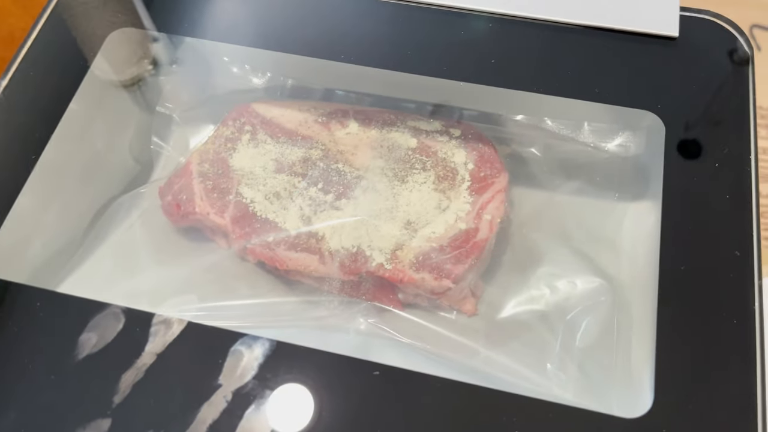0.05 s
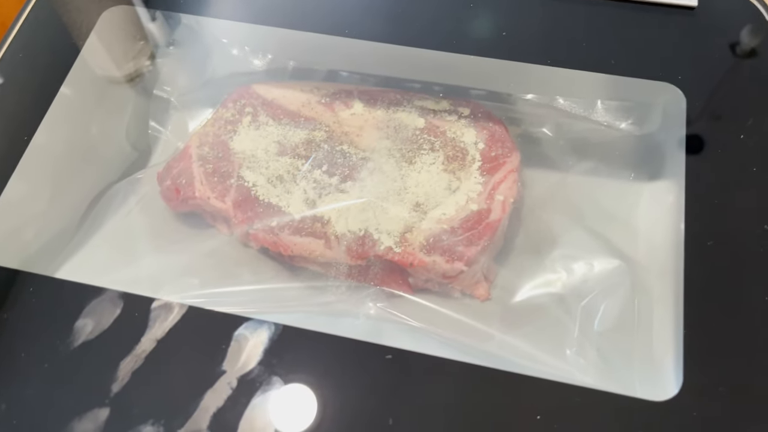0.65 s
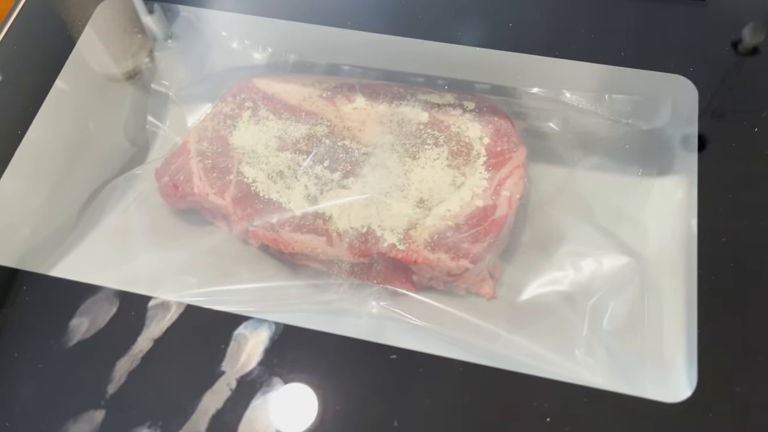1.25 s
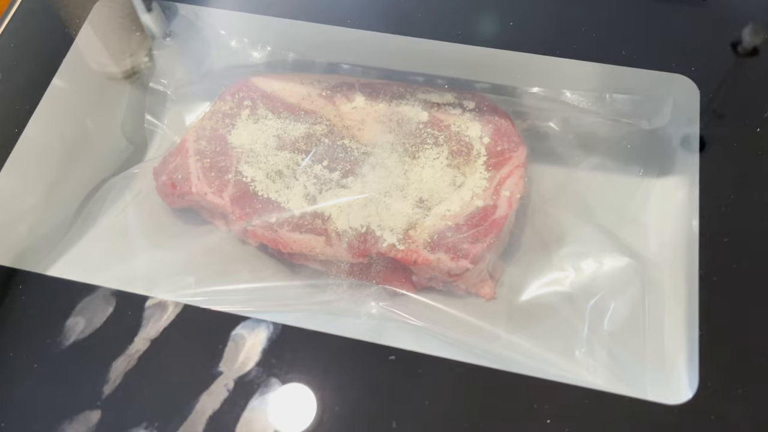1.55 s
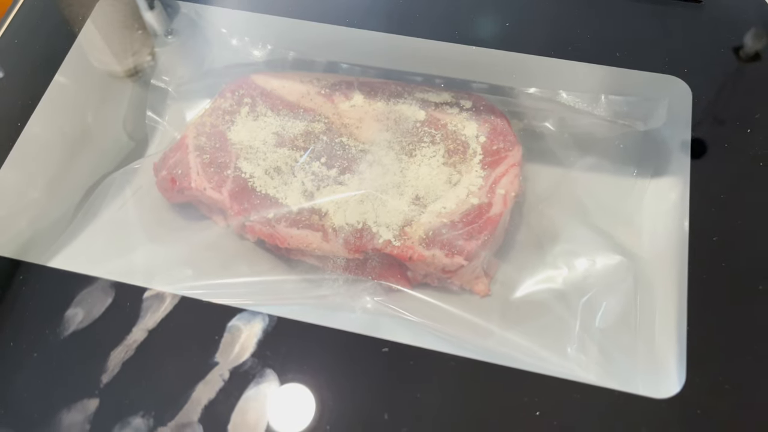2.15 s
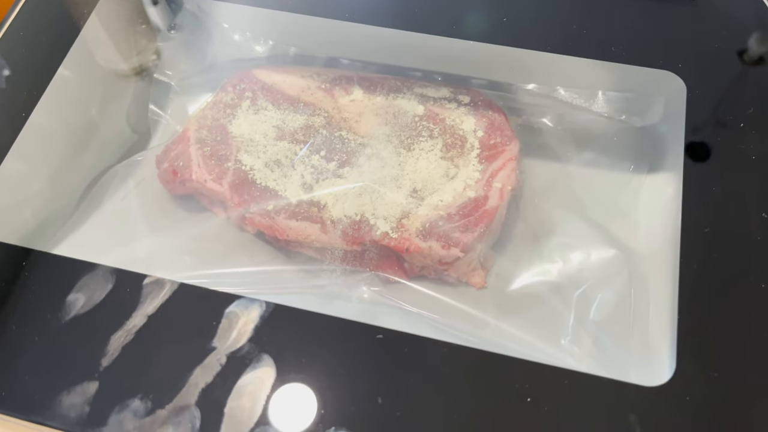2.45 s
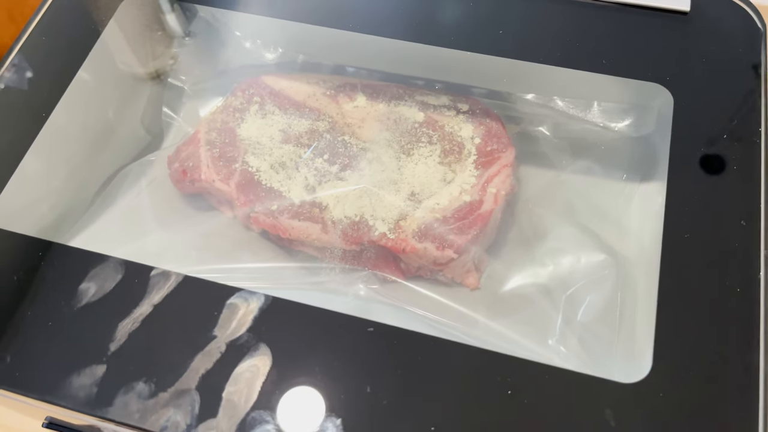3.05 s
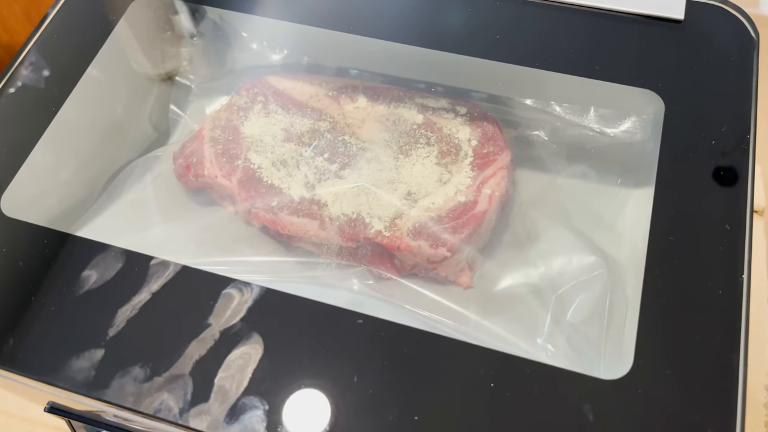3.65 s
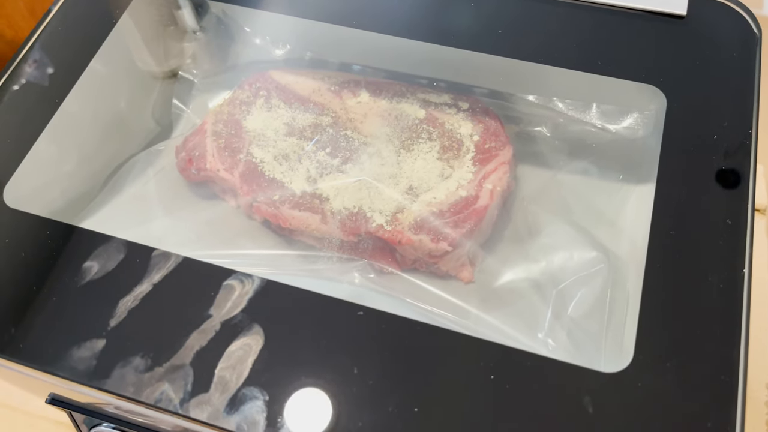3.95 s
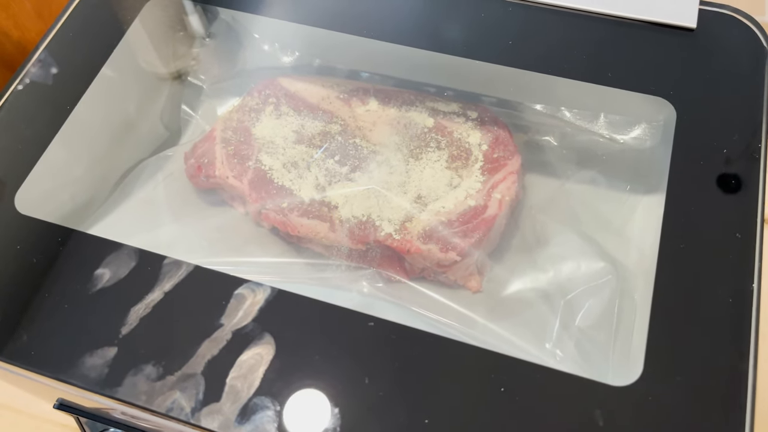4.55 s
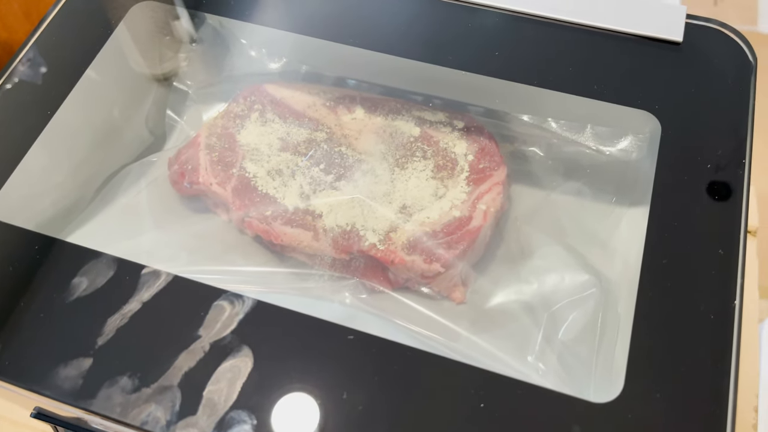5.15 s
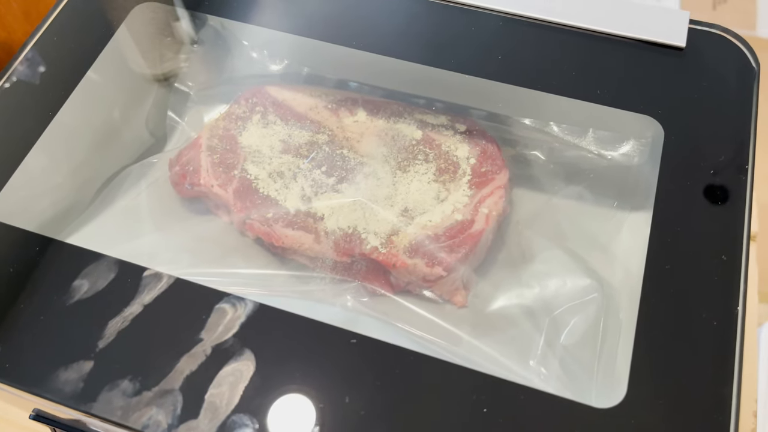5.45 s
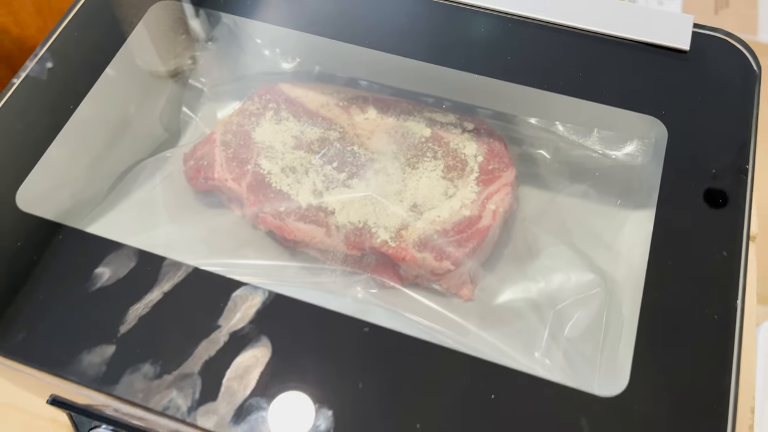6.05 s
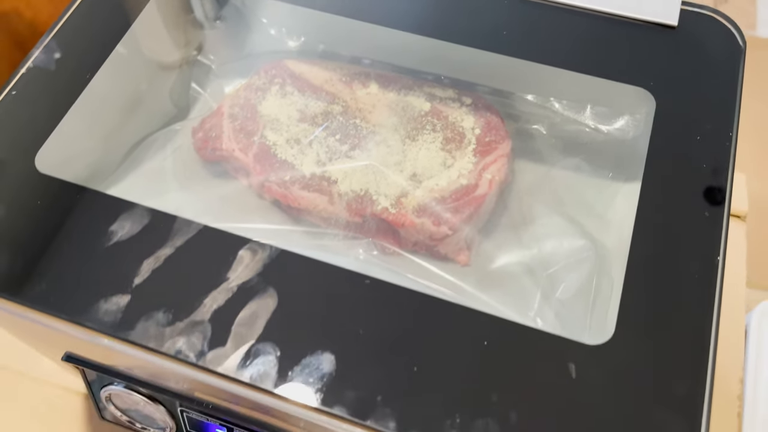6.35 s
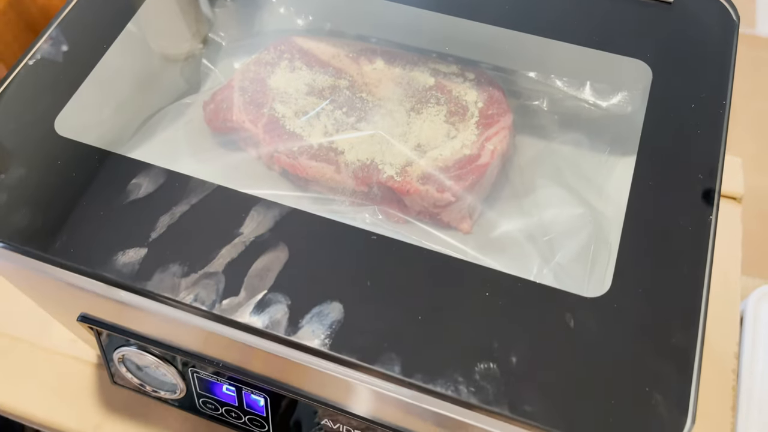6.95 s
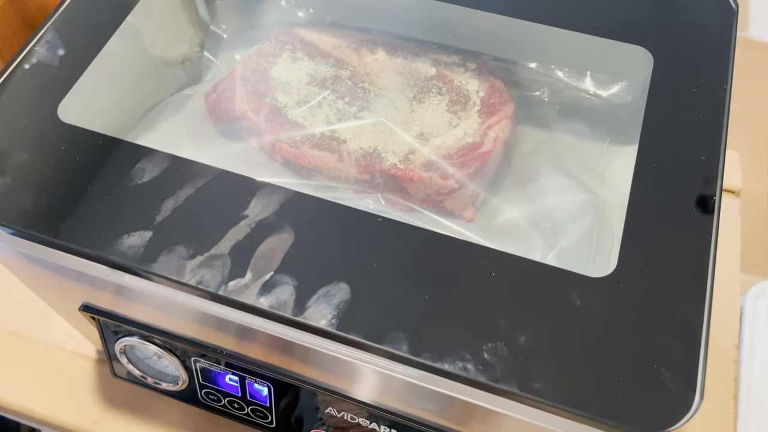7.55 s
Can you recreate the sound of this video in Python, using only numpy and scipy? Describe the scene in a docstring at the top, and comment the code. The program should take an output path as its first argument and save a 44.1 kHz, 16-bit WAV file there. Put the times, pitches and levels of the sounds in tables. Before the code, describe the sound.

A vacuum sealer runs on a kitchen counter from start to finish, about eight seconds, heard from close by. Its pump makes a loud, steady hum of very rapid, even thumps with a slight throb. Above it sit a buzzing rasp and a thin hiss of air pulsing with the pump, and underneath is a low fan drone. Over the first few seconds the pump speeds up very slightly and sounds a little thinner. The plastic bag rustles faintly at about 0.6 seconds, then crinkles and snaps briefly between 1.7 and 2.6 seconds, most clearly near 2.2. A hand makes soft, low bumps on the microphone between 3.4 and 4.2 seconds, and again around 6.6 and 6.9. From about 6 seconds the microphone draws back, and the hum softens a little while the airy rasp carries on.

```python
"""A vacuum sealer on a kitchen counter

A piston pump runs at about 36 turns a second. Each turn brings a piston thump, an exhaust slap
and an inlet tick, with spits of air at the valves. A fan hums, and the pump throbs against it.
As the chamber empties, the pump speeds up and sounds thinner, and the bag crinkles.
A hand softly bumps the microphone, which draws back near the end."""
import sys
import numpy as np
from scipy import signal
from scipy.fft import rfft, irfft, next_fast_len
from scipy.io import wavfile
from scipy.ndimage import map_coordinates

SR = 44100
rng = np.random.default_rng(int(sys.argv[2]) if len(sys.argv) > 2 else 0)


def int16_out(signal):
    """Quantize to a 16-bit WAV file."""
    q = np.round(np.clip(np.atleast_2d(signal).T, -1, 1) * 32767)
    wavfile.write(sys.argv[1], SR, q.astype(np.int16))


N = 343980
TIME = np.arange(N) / SR

# The microphone draws back. Each row: time in seconds, how far back from 0 to 1.
MIC_RETREAT = [(0, 0.07), (5.8, 0.29), (7, 0.86), (7.8, 1)]
# The tones that each kind of blow sets ringing. Each row: pitch in Hz, width in Hz (wider dies
# sooner), level in dB, dB added at full vacuum, dB added with the microphone drawn back,
# dB by which the left is louder than the right, radians by which the left is ahead.
PISTON_TONES = [(75.53, 9.9, -28.5, -1.3, -1.181, -0.2, 0.065), (160.5, 32, -41, 4.5, -3, -1, 0.7),
                (201.3, 26.3, -21, -0.5, -1.7, -0.3, -0.171), (263.8, 125.6, -22.5, -5, -2, 0.4, -0.23),
                (365.4, 86.4, -24, -2.5, -2.4, -5, -0.68), (384.45, 22.5, -25.5, 1, -1.2, -4, -1.34),
                (513.1, 20, -33.5, -0.7, -3, 6, -0.55), (1230.4, 280, -49, 1, -26, -9.5, 1),
                (1588, 129, -46, -1.5, 0.2, -6.5, 0.56), (1732, 390, -49, -1.5, -10, 7.5, 0.73)]
EXHAUST_TONES = [(301.2, 94, -27.5, -3, -16, -0.5, 0.55), (477.7, 63.7, -30, -0.12, -0.1, 2, -0.58),
                 (474.6, 99.7, -35.5, -1, 2, 5, -0.88), (688, 64.5, -37.5, 1.5, -0.7, -3, -1.68),
                 (743.4, 68.6, -38, 0.2, -1, 0.5, 0.055), (830, 97, -41, -3, 0, 2.5, 1.1),
                 (1052.7, 66, -43, 3, -0.8, -1.3, 1.39), (1185, 81, -43, 1, 1, 2, 0.64),
                 (1284, 161, -41.5, -2, -3, 4.5, 0.81), (1430, 680, -53.5, 0.5, -1.5, -1, -0.7),
                 (1628, 170, -53, 5.5, -2.5, 2.49, 0.15), (1772, 58, -46, 2.5, -7.5, 2, 0.38),
                 (2297, 67, -53, -2.5, 6, -1.0135, 0.63), (2764, 11.4, -54.5, 0.5, -10, -18, 1.3),
                 (3733, 72, -51, 1, -12, -16.5, -1.8)]
INLET_TONES = [(1200, 166, -50.5, -3, 3, -0.2, -0.55), (1968, 170, -52, -3.5, -9, -0.099, 0.36),
               (2302, 113, -49, 0.5, 4.5, -1.1, 0.91), (3100, 950, -62, -6.5, 1, -0.79, -1.64),
               (3570, 125, -52, 1, 0.5, -1.1, -1), (3840, 310, -58, -3.5, 8.5, -0.5, -1.4)]
# Spits of air within a turn. Each row: middle in turns, width in turns, rasp in dB, hiss in dB.
# Both levels are relative to the steady leak.
AIR_SPITS = [(.175, 0.084, -1.5, -10), (.28, 0.029, 4, -7.5), (.71, 0.012, -5.5, 3.5), (.83, .055, -5, 2)]
# The tone colour of each noise. Each row: frequency in Hz, relative level in dB.
RASP_COLOUR = [(1200, -14), (2080, -6), (2310, -1), (2550, -4.5), (3100, -1.5), (3600, -0.5), (4000, -1.5),
               (4350, -5.5), (5000, -4.5), (6000, -8), (8000, -20), (12000, -55)]
REED_COLOUR = [(1400, -33), (1900, 1.5), (2350, 1.5), (2600, -8), (3150, -2.5), (3600, 1.5), (4000, -4),
               (4400, -15.5)]
HISS_COLOUR = [(3500, -23), (5200, -5), (6300, 0), (7800, -4.5), (9300, -9), (10300, 2.5), (11400, 0),
               (12200, -12.5), (13000, -24)]
FAN_COLOUR = [(20, -30), (32, -27), (48, -4), (90, -8), (150, -3.5), (350, -11), (500, -7), (600, -13.5),
              (750, -13), (950, -15), (1250, -16.5), (1750, -17), (2600, -23), (6000, -45)]
BAG_COLOUR = [(2000, -18), (4000, 0), (7000, -2), (10500, 2), (13000, -12)]
HAND_COLOUR = [(20, -26.5), (42, -0.5), (60, -3), (110, -8), (300, -35)]
# The bag shifts and crinkles. Each row: middle in seconds, level in dB, width in seconds.
BAG_CRINKLES = [(.64, -48, 0.035), (2.025, -42, 0.01), (2.185, -42, 0.041), (2.42, -46, 0.034),
                (2.59, -41, 0.027)]
# A crease in the bag snaps over. Each row: time in seconds, level in dB.
CREASE_SNAPS = [(1.755, -38), (2.193, -31), (2.58, -44)]
# The hand bumps the microphone. Each row: time in seconds, level in dB.
HAND_BUMPS = [(3.4, -39), (3.63, -43), (3.9, -41), (4.22, -42), (6.58, -39), (6.9, -38)]

OPEN_AIR_TURNS_PER_S, VACUUM_TURNS_PER_S, FAN_HZ = 35.3535, 36.2827, 66.69
EMPTYING_S = 2.186   # about two thirds of the air is gone after this long
# How much sooner each sound reaches the left side of the microphone (negative means later).
RASP_LEAD_S, HISS_LEAD_S, FAN_LEAD_S, BAG_LEAD_S = 0.000505, 0.000158, -0.000097, 0.000163


def from_db(db):
    """Turn decibels into a number to multiply by."""
    return 10 ** (np.asarray(db) / 20)


def noise(colour, alike, lead_s):
    """Stereo noise at level 1; the share `alike` reaches both sides, the left one lead_s sooner."""
    hz = np.arange(N // 2 + 1) * SR / N
    points_hz, points_db = np.transpose(colour)
    gain = from_db(np.interp(np.log(hz + 1), np.log(points_hz), points_db))
    gain *= np.minimum(hz / points_hz[0], 1) ** 2   # fade beyond both ends of the table
    gain *= np.minimum(points_hz[-1] / (hz + 1), 1) ** 2
    direct, *scattered = rfft(rng.standard_normal((3, N)))
    lead = 2 * np.pi * hz * lead_s * np.array([[.5], [-.5]])
    mix = np.sqrt(alike) * direct * np.exp(1j * lead) + np.sqrt(1 - alike) * np.array(scattered)
    sound = irfft(gain * mix, N)
    return sound / sound.std()


def swells(rows):
    """A loudness curve that rises and falls in a short bell shape for each row."""
    out = np.zeros(N)
    for middle_s, db, width_s in rows:
        near = np.abs(TIME - middle_s) < 5 * width_s
        out[near] += from_db(db) * np.exp(-.5 * ((TIME[near] - middle_s) / width_s) ** 2)
    return out


def beat_with_fan(turns, peak_cycles):
    """A slow wave as twice the shaft's speed slips in and out of step with the fan hum."""
    cycles = 2 * turns - FAN_HZ * TIME
    return np.cos(2 * np.pi * (cycles - peak_cycles))


def shaft(vacuum, swing_turns):
    """Count the turns: the shaft speeds up as its load falls and swings a little with the beat."""
    speed = OPEN_AIR_TURNS_PER_S + (VACUUM_TURNS_PER_S - OPEN_AIR_TURNS_PER_S) * vacuum
    turns = np.cumsum(speed) / SR
    return turns + swing_turns * beat_with_fan(turns, peak_cycles=.385)


def blows(turns, moment, uneven_db, jitter_s, soft_hz):
    """One blow at the given moment of each turn, a little uneven in time and force."""
    times = np.interp(np.arange(int(turns[-1] - moment) + 1) + moment, turns, TIME)
    chance = rng.standard_normal((len(times), 2))
    at = np.clip((times + jitter_s * chance[:, 0]) * SR, 0, N - 2)
    force = from_db(uneven_db * chance[:, 1]) * N / len(at) / 2   # each overtone has a height near 1
    whole, part = at.astype(int), at % 1   # a blow is shared between two samples
    clicks = np.bincount(whole, force * (1 - part), N) + np.bincount(whole + 1, force * part, N)
    clicks = signal.sosfilt(signal.butter(6, soft_hz, fs=SR, output="sos"), clicks - clicks.mean())
    return signal.hilbert(clicks, next_fast_len(N))[:N]   # complex, so ring() can shift each side


def ring(hits, tones, vacuum, retreat):
    """Blows ring the pump and then its housing, so each resonance acts twice."""
    step = 4   # all tones lie under 5 kHz, so every fourth sample is enough
    hits, vacuum, retreat, rate = hits[::step], vacuum[::step], retreat[::step], SR / step
    out = np.zeros((2, len(hits)))
    for k, (hz, width, db, vacuum_db, retreat_db, left_db, lead) in enumerate(tones):
        decay = np.exp(-np.pi * width / rate)
        pole = decay * np.exp(2j * np.pi * hz / rate)
        direction = (-1) ** k   # neighbouring tones swing opposite ways
        tone = signal.lfilter([direction * (1 - decay) ** 2], [1, -2 * pole, pole * pole], hits)
        tone *= from_db(db + vacuum_db * vacuum + retreat_db * retreat)
        pan = from_db(left_db / 2) * np.exp(.5j * lead)
        out += np.real([tone * pan, tone / pan])
    return signal.resample_poly(out, step, 1, axis=1)[:, :N]


def pump(turns, vacuum, retreat):
    """The piston thumps, the exhaust valve slaps shut, and the inlet valve ticks the other way."""
    early_turns = 0.018 * vacuum   # the exhaust shuts sooner as the chamber empties
    piston = blows(turns, moment=.784, uneven_db=0.17, jitter_s=.00002, soft_hz=4900)
    exhaust = blows(turns + early_turns, moment=.0779, uneven_db=0.02, jitter_s=.00003, soft_hz=4500)
    inlet = blows(turns, moment=.625, uneven_db=0.7, jitter_s=.00004, soft_hz=4778)
    thump = ring(piston, PISTON_TONES, vacuum, retreat)
    slap = ring(exhaust, EXHAUST_TONES, vacuum, retreat)
    tick = ring(inlet, INLET_TONES, vacuum, retreat)
    throb_db = 0.47 * beat_with_fan(turns, peak_cycles=.84)
    return from_db(throb_db) * (thump + slap - tick)


def valve_air(turns, vacuum, retreat):
    """Air spits through the valves on every turn, over a steady leak, and shakes their reeds."""
    rasp_pulse, hiss_pulse = 1, 1
    for moment, width, rasp_db, hiss_db in AIR_SPITS:
        turns_away = (turns - moment + .5) % 1 - .5
        opening = np.exp(-.5 * (turns_away / width) ** 2)
        rasp_pulse += opening * from_db(rasp_db)
        hiss_pulse += opening * from_db(hiss_db)
    rasp_pulse /= np.sqrt(np.mean(rasp_pulse ** 2))
    hiss_pulse /= np.sqrt(np.mean(hiss_pulse ** 2))
    rasp = from_db(-46 + 0.62 * retreat) * noise(RASP_COLOUR, alike=0.58, lead_s=RASP_LEAD_S)
    reeds = from_db(-45 + 3 * retreat) * reed_rattle(turns)
    hiss = from_db(-47.5 - vacuum + 1.4 * retreat) * noise(HISS_COLOUR, alike=1, lead_s=HISS_LEAD_S)
    return rasp_pulse * (rasp + reeds) + hiss_pulse * hiss


def reed_rattle(turns):
    """The reeds, thin flaps in the valves, clatter the same way on every turn, which makes a buzz."""
    count = round(SR / 36)   # samples in about one turn
    one_turn = noise(REED_COLOUR, alike=0.25, lead_s=RASP_LEAD_S)[:, :count]
    one_turn /= one_turn.std()
    position = turns % 1 * count
    return np.array([map_coordinates(side, [position], order=3, mode="wrap") for side in one_turn])


def fan():
    """The fan makes a low hum, a faint tone an octave higher and a rush of cooling air."""
    angle = 2 * np.pi * FAN_HZ * TIME
    hum = from_db(-53) * np.cos(2 * angle) - from_db(-37.5) * np.cos(angle)
    return hum + from_db(-38) * noise(FAN_COLOUR, alike=0.74, lead_s=FAN_LEAD_S)


def bag(grain_db):
    """The plastic film crinkles and snaps in tiny grains of sound, each with its own loudness."""
    chance = np.repeat(rng.standard_normal(N // 40 + 1), 40)[:N]   # a grain lasts about a millisecond
    grains = from_db(grain_db * chance)
    grains /= np.sqrt(np.mean(grains ** 2))
    movement = swells(BAG_CRINKLES) + swells([(s, db, 0.0011) for s, db in CREASE_SNAPS])
    return movement * grains * noise(BAG_COLOUR, alike=1, lead_s=BAG_LEAD_S)


def hand(width_s):
    """Each bump of the hand on the microphone is a short low rumble, the same on both sides."""
    bumps = swells([(s, db, width_s) for s, db in HAND_BUMPS])
    return bumps * noise(HAND_COLOUR, alike=1, lead_s=0)


def scene():
    """The machine runs throughout while the chamber empties; the bag and the hand join in briefly."""
    vacuum = 1 - np.exp(-TIME / EMPTYING_S)   # 0 is open air, 1 is full vacuum
    retreat = np.interp(TIME, *np.transpose(MIC_RETREAT))
    turns = shaft(vacuum, swing_turns=.0024)
    machine = pump(turns, vacuum, retreat) + valve_air(turns, vacuum, retreat) + fan()
    return machine + bag(grain_db=4.5) + hand(width_s=0.049)


def record(dry):
    """Cut the treble steeply above 12700 Hz."""
    return signal.sosfilt(signal.ellip(10, .1, 80, 12700, fs=SR, output="sos"), dry)


dry = scene()
out = record(dry)
int16_out(out)
```